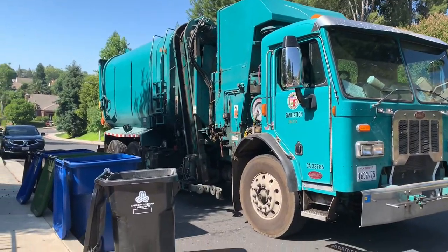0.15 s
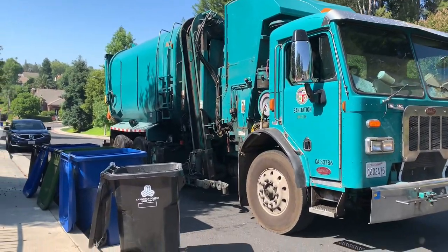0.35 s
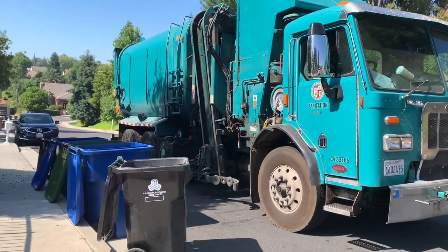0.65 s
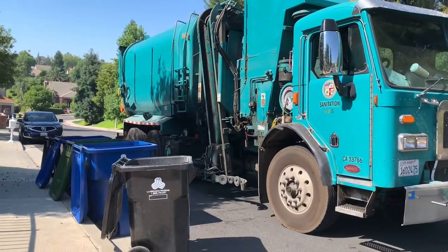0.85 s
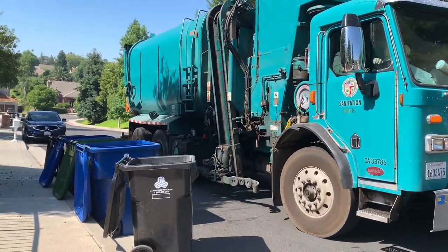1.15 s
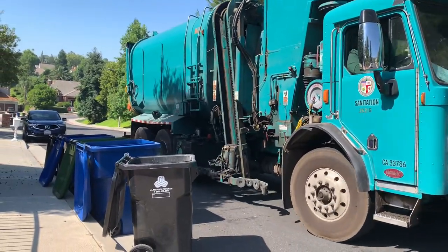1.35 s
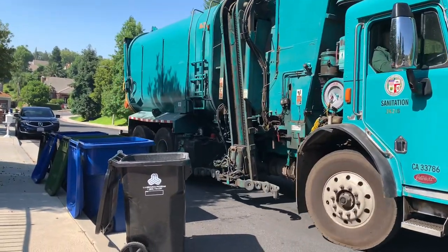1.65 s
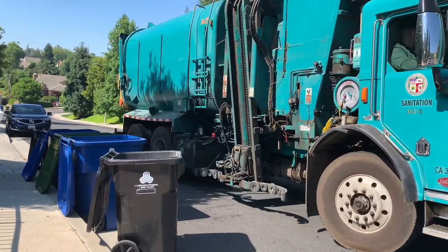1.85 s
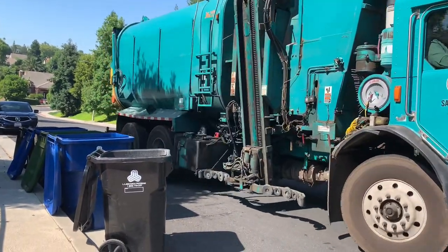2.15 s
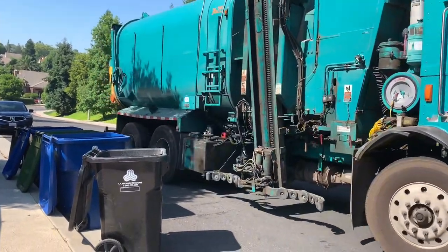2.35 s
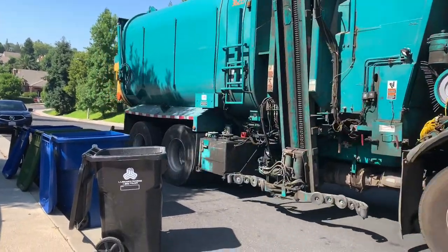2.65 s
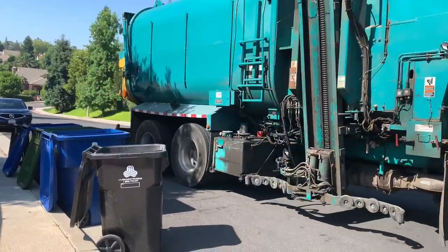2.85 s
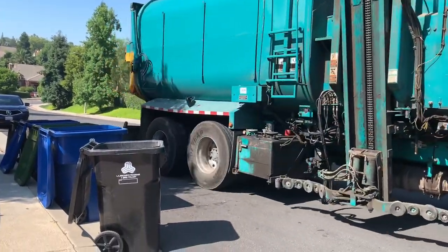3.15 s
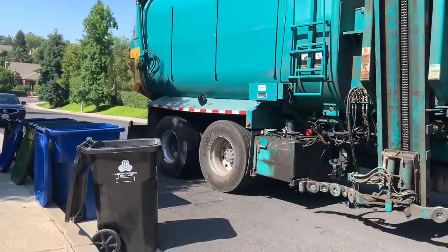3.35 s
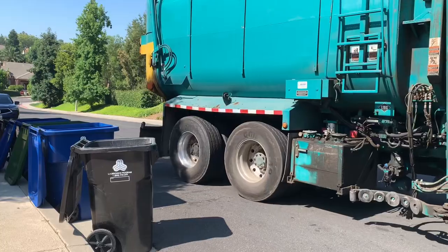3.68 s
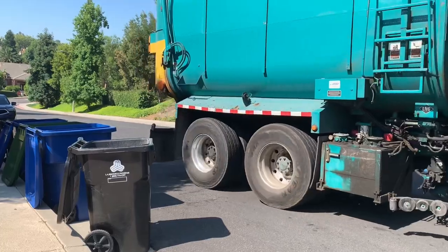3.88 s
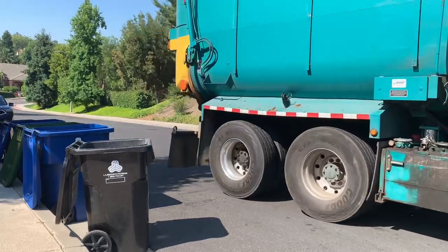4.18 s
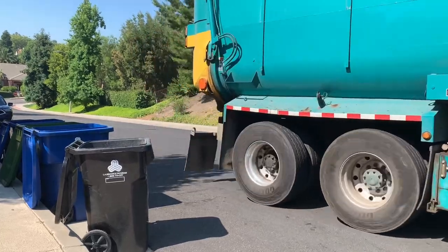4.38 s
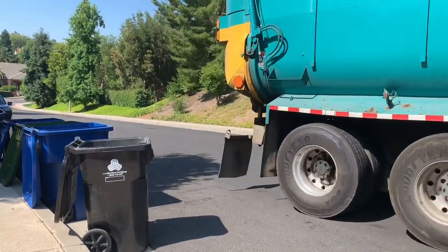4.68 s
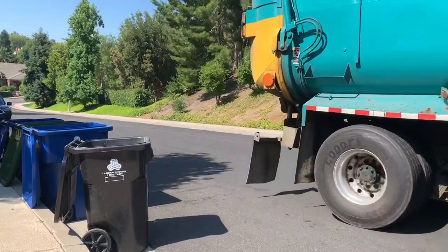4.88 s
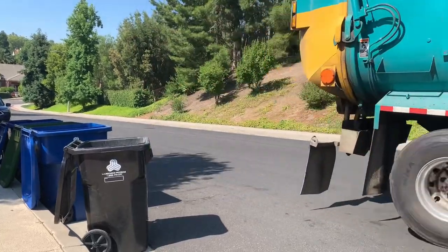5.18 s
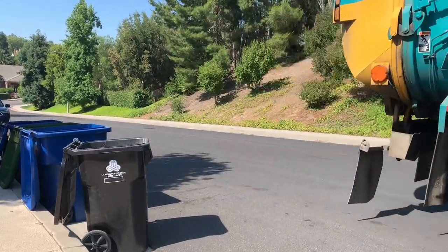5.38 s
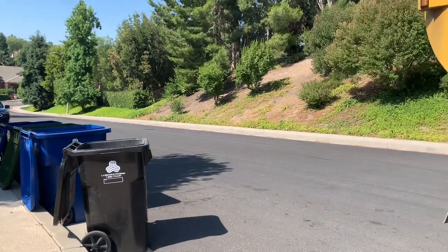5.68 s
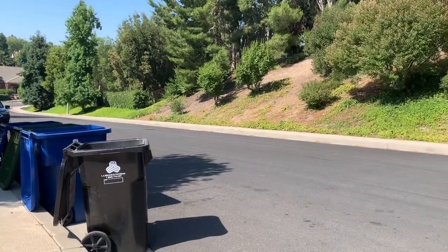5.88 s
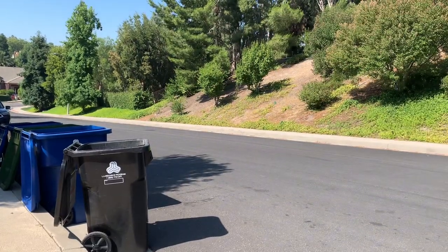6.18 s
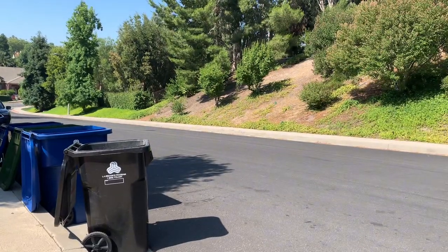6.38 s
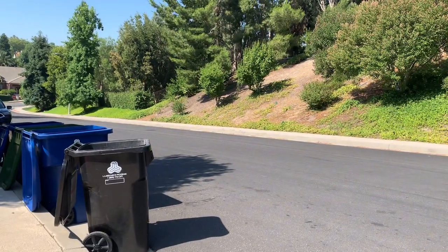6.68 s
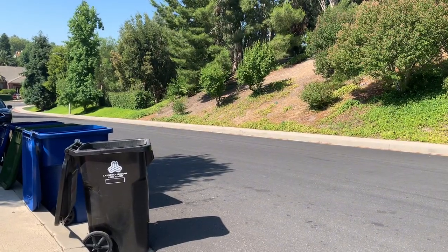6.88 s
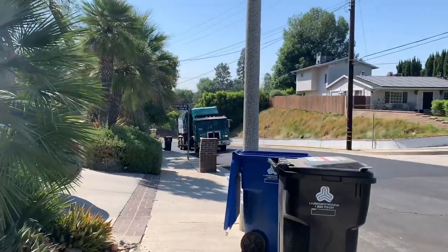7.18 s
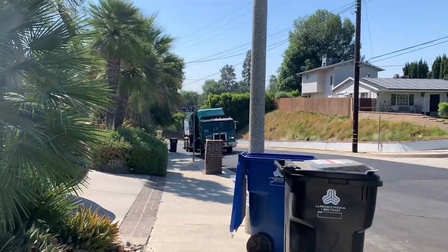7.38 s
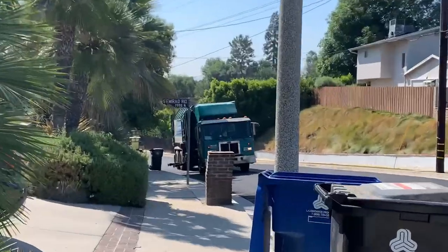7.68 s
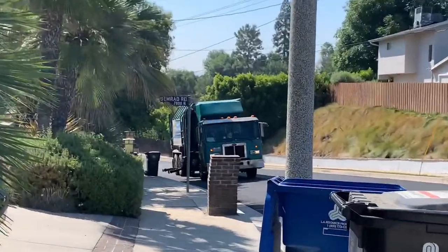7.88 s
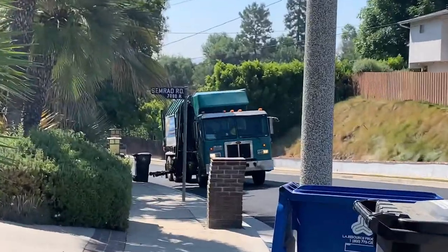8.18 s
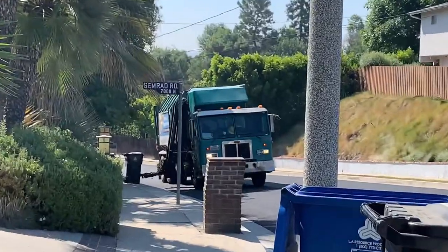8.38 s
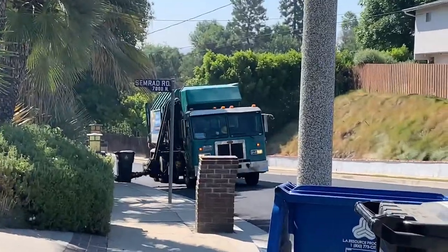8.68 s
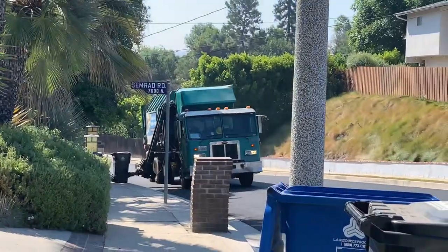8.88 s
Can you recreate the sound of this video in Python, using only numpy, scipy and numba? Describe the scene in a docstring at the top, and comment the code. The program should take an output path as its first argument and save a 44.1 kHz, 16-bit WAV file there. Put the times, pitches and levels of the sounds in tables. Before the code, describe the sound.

A garbage truck's diesel engine growls and climbs in pitch as it pulls away close by, then idles far off with hiss and dull arm knocks.

```python
"""A truck engine's exhaust growls and climbs in pitch as a six-cylinder refuse truck pulls away past a phone
on the kerb; then, from far down the street, the truck idles and works its arm.
Steady sines locked to the crank give exhaust orders, fan tone and gear whine, which swell at fixed peaks as
they glide past. Filtered noise gives rough exhaust, fan rush, hiss, tyres and vented air; decaying noise
bursts give ticks and arm knocks; gliding tones give whistles, and swelling noise bands a bird's chirps."""
import sys
import numpy as np
from scipy import signal
from scipy.fft import rfft, irfft, next_fast_len
from scipy.io import wavfile
from scipy.ndimage import uniform_filter1d
from numba import njit

SR = 44100
rng = np.random.default_rng(int(sys.argv[2]) if len(sys.argv) > 2 else 0)


def waveform_to_disk(signal):
    """Save audio, clipped to [-1, 1], as 16-bit WAV at the path in sys.argv[1]."""
    frames = np.transpose(np.atleast_2d(signal))
    scaled = np.clip(frames, -1, 1) * 32767
    samples = np.round(scaled).astype(np.int16)
    wavfile.write(sys.argv[1], SR, samples)


def boost(x):
    """Linear amplitude factor 10**(x/20) for a level x in decibels (scalar or array-like)."""
    u = np.asarray(x, float) / 20
    return 10 ** u


N = 398663
T = np.arange(N) / SR
NEAR_END_S = 6.955  # the near scene gives way to the far one
CASE_LAG = 13  # samples by which treble reaches the left port late, round the phone's case
CASE_LAG_MS = 1000 * CASE_LAG / SR


def unit_rms(x):
    """Normalisation: the signal is divided by its root mean square."""
    return x / np.sqrt(np.mean(x ** 2))


def columns(table):
    """Linear interpolation in time: each column of (t, ..) rows becomes a curve."""
    s, *rest = np.transpose(table)
    return [np.interp(T, s, column) for column in rest]


def along(hz, points):
    """Interpolation on a logarithmic frequency axis, from (f, value) points."""
    point_hz, values = np.transpose(points)
    return np.interp(np.log(hz + 1), np.log(point_hz), values)


def walk(rate):
    """Random fluctuation: levels held 1 / rate s and smoothed twice, with a spread near 1."""
    hold = int(SR / rate)
    steps = np.repeat(rng.standard_normal(N // hold + 1), hold)
    return 1.64 * uniform_filter1d(uniform_filter1d(steps, hold), hold)[:N]


@njit
def svf(x, hz, width):
    """Resonance: a state-variable band-pass whose centre may move, with gain 1 at the centre."""
    y, band, low = np.empty(len(x)), 0., 0.
    for i in range(len(x)):
        g, k = np.tan(np.pi * hz[i] / SR), width / hz[i]
        v = (band + g * (x[i] - low)) / (1 + g * (g + k))
        band, low, y[i] = 2 * v - band, low + 2 * g * v, k * v
    return y


def ring(x, modes):
    """Modal superposition: fixed resonances respond in parallel and add."""
    return sum(boost(db) * svf(x, np.full(N, 1. * hz), 1. * width) for hz, width, db in modes)


def skirt(hz, width_hz, db):
    """Narrow-band noise: two equal resonances in series select a band whose centre may move."""
    return boost(db) * unit_rms(svf(svf(rng.standard_normal(N), hz, width_hz), hz, width_hz))


def response_db(hz, peaks, between_db):
    """Frequency response: a gliding tone rises at fixed steep-sided peaks above the floor between_db."""
    grid = np.geomspace(20, 8000, num=4000)
    power = sum(boost(2 * db) / (1 + ((grid - f) / (width / 2)) ** 4) for f, width, db in peaks)
    return np.interp(hz, grid, 10 * np.log10(power + boost(2 * between_db)))


def bursts(times, levels_db, t60s):
    """Impulsive excitation: noise starts suddenly and decays exponentially, by 60 dB in t60."""
    out = np.zeros(N)
    for s, db, t60 in zip(times, levels_db, t60s):
        tail = T[:int(t60 * SR) + 1]
        i = int(s * SR)
        out[i:i + len(tail)] += boost(db - 60 * tail / t60)[:N - i]
    return out * rng.standard_normal(N)


def whistle(table, flicker_db):
    """Frequency modulation: a thin tone glides, silent before its (t, f, level) table and soon after."""
    hz, db = columns(table)
    on = (T > table[0][0]) & (T < min(table[-1][0] + .06, NEAR_END_S))
    return on * np.sqrt(2) * boost(db + flicker_db * walk(17)) * np.sin(2 * np.pi * np.cumsum(hz) / SR)


# likeness of diffuse noise at the two microphone ports: f/Hz, likeness/0-1
PORT_LIKENESS = [(60, 0.69), (250, 1), (500, 0.77), (1000, 0.57), (2500, 0.36), (5000, 0.2), (8000, 0),
                 (14000, 1)]


def coloured(points, case_lag_ms=0.):
    """Coherence: noise of a given spectrum is partly shared by the ports, its shared part late on the left."""
    size = next_fast_len(N)
    hz = np.arange(size // 2 + 1) * SR / size
    same, left, right = (rfft(rng.standard_normal(size)) for _ in range(3))
    like = np.clip(along(hz, PORT_LIKENESS), 0, 1)
    late = np.exp(-2j * np.pi * hz * case_lag_ms / 1000)
    shared = np.sqrt(like) * same * np.array([late, late ** 0])
    pair = shared + np.sqrt(1 - like) * np.array([left, right])
    inside = (hz > points[0][0]) & (hz < points[-1][0])
    return unit_rms(irfft(pair * boost(along(hz, points)) * inside, size)[:, :N])


def rush(colours, db, flicker_db, case_lag_ms=0.):
    """Broadband flow noise: the near spectrum sounds first and the far one after."""
    near, far = (coloured(c, case_lag_ms) for c in colours)
    return np.where(T < NEAR_END_S, near, far) * boost(db + flicker_db * walk(12))


def between(pipe_db, bay_db, share, near_db, far_db):
    """Level interpolation: a part lies between tail pipe and engine bay, share being the pipe's."""
    return share * pipe_db + (1 - share) * bay_db + np.where(T < NEAR_END_S, near_db, far_db)


# engine speed and reference levels, near then far: t/s, firing rate f/Hz, tail-pipe level/dB, bay level/dB
ENGINE_COURSE = [(0.0, 38.1, -30.5, -51.5), (0.3, 43.58, -29, -49.5), (0.6, 47.95, -26, -47),
                 (1.05, 51.73, -23, -43), (1.5, 53.87, -22, -40.5), (2.25, 58.7, -22, -37.5),
                 (2.7, 62.2, -21, -35.5), (3.6, 67.24, -18.5, -32.5), (4.5, 72.74, -19, -36),
                 (5.55, 80.97, -18.5, -37.5), (6.15, 89.64, -17.5, -39), (6.3, 90.9, -18.5, -39),
                 (6.45, 92.4, -19, -39), (6.62, 93.2, -20, -40), (6.78, 92.6, -20.5, -41),
                 (6.86, 91.3, -21, -42), (6.95, 91.7, -21.5, -42.5), (6.96, 33.3, -33.5, -53.5),
                 (7.34, 36.15, -30.5, -56.5), (7.5, 34.48, -31.5, -51), (7.62, 34.75, -32, -52),
                 (7.82, 42.45, -30, -53.5), (7.92, 45.18, -27, -55), (7.99, 43.8, -29, -54.5),
                 (8.12, 38.84, -31.5, -53.5), (8.3, 37.53, -30.5, -59), (8.77, 37.6, -30, -53.5),
                 (9.04, 50.17, -26, -51.5)]


def crank():
    """Phase accumulation: the slightly trembling firing rate is summed into the crank's firing phase."""
    hz, pipe_db, bay_db = columns(ENGINE_COURSE)
    turn = 2 * np.pi * np.cumsum(hz * (1 + .002 * walk(15))) / SR
    return hz, pipe_db, bay_db, turn


# clean lines (firing, uneven pair, second, fan blades, pump, gear mesh, mesh overtone):
# f as multiple of firing rate/1, flicker level/dB
TONES = [(1, .45), (1.5, 1.5), (2, 1.5), (4.29, 1.5), (15.6, 1.8), (32.33, 2), (64.66, 3)]
MULTIPLES = [k for k, _ in TONES]
BLADES, PUMP, MESH, OVERTONE = MULTIPLES[3:]


def tones(turn, slip, levels_db):
    """Order locking: sines follow multiples of the crank phase, and flutter as panels and echoes shift."""
    out = []
    for (k, flicker_db), db in zip(TONES, levels_db):
        phase = k * turn + slip * (k == BLADES)
        out.append(np.sqrt(2) * boost(db + flicker_db * walk(28)) * np.sin(phase))
    return out


# firing, uneven pair, second, fan blades, third order over the pipe reference:
# near level/dB, far level/dB, loss as the revs smooth out/dB, firing rate where the loss is full f/Hz
ORDER_LEVELS = [(7.5, -7, 0, 33), (-0.5, -9, 9, 74), (11.5, 1, 22, 48.7), (-1, -0.5, 0, 120), (2, 2, 2, 62)]
# resonances of pipe and body met by the low orders: f/Hz, width/Hz, level/dB
PIPE_MODES = [(55, 17, -6.5), (66.3, 17.3, 0), (76, 14, -2), (84.4, 5, -5), (92.94, 3.6, -2.5),
              (147, 21, -11), (167, 8.1, -19), (174.3, 8.7, -6), (184, 14, -7.5), (198.8, 13.6, -1.5),
              (226.4, 19.6, 1), (247.6, 3.7, -4.5), (273.3, 19, -3.5), (325, 6, -5.5), (348, 37, -11.5),
              (353.5, 8.3, -5), (390.4, 10.2, 0)]
# resonances that lift the pump tone, near: f/Hz, width/Hz, level over the bay reference/dB
PUMP_MODES = [(800, 90, 2), (990, 50, 0), (1054, 28, 7), (1095, 44, 6), (1340, 62, 3), (1454, 46, 4)]
# where the gliding mesh and overtone swell, near, as echoes fade and reinforce them: f/Hz, width/Hz, level/dB
GEAR_SWELLS = [(1400, 120, 4), (1525, 90, 11), (1625, 40, 8), (1665, 30, 5), (1730, 40, 3), (1768, 20, 4),
               (1840, 50, 9), (1882, 24, 11), (2040, 70, 1), (2085, 40, 4), (2130, 55, 9), (2165, 35, 11),
               (2225, 30, -6), (2292, 20, 1), (2395, 30, 4), (2445, 45, 12), (2512, 30, 10), (2567, 22, 7),
               (2604, 18, 7), (2714, 32, 9), (2790, 34, 8), (2885, 40, 11), (2952, 22, 5), (3009, 16, 2),
               (2780, 330, -3), (4240, 160, 21), (4520, 130, 17)]
# resonances that lift all three whines from afar: f/Hz, width/Hz, level over the bay reference/dB
FAR_MODES = [(600, 200, -6), (1165, 90, 7), (1225, 60, 8), (1320, 80, 6), (1440, 140, 7), (1570, 120, 9),
             (2620, 200, 5), (2850, 200, 2)]
# bearing of the gear case; the far overtone fades as the truck turns: t/s, left lag/ms, overtone level/dB
GEAR_BEARING = [(0, .04, 0), (1.4, .06, 0), (2, .13, 0), (3.65, .15, 0), (3.75, .41, 0), (4.3, .41, 0),
                (4.9, .35, 0), (6.95, .34, 0), (6.96, -.01, 1), (8.3, -.01, 1), (8.8, -.01, -10)]
PIPE_FLOOR_DB, PUMP_FLOOR_DB, GEAR_FLOOR_DB = -21, -12, -14  # gain away from any peak


def tone_levels(hz, pipe_db, bay_db):
    """Source-filter principle: each line's level is its source level plus the gain at its frequency."""
    near = T < NEAR_END_S
    rough_hz = 41.3  # firing rate from which the uneven orders fade
    low = []
    for k, (near_db, far_db, lost_db, smooth_hz) in zip(MULTIPLES[:4] + [3], ORDER_LEVELS):
        source_db = pipe_db + np.where(near, near_db, far_db)
        smoothness = np.clip((hz - rough_hz) / (smooth_hz - rough_hz), 0, 1)
        low.append(source_db + response_db(k * hz, PIPE_MODES, PIPE_FLOOR_DB) - lost_db * smoothness)
    third = low.pop()
    near_lifts = (response_db(PUMP * hz, PUMP_MODES, PUMP_FLOOR_DB),
                  response_db(MESH * hz, GEAR_SWELLS, GEAR_FLOOR_DB),
                  response_db(OVERTONE * hz, GEAR_SWELLS, GEAR_FLOOR_DB) - 24)
    pump, mesh, overtone = [bay_db + np.where(near, lift, response_db(k * hz, FAR_MODES, GEAR_FLOOR_DB))
                            for lift, k in zip(near_lifts, (PUMP, MESH, OVERTONE))]
    # the far mesh and second order quieten while the revs fall
    falling_hz_per_s = uniform_filter1d(np.minimum(np.gradient(hz) * SR, 0) * (T > 7), SR // 20)
    overrun_db = .09 * falling_hz_per_s
    low[2] = low[2] + 2 * overrun_db
    return low + [pump, mesh + overrun_db, overtone + columns(GEAR_BEARING)[1]], third


# spectra of rough exhaust, one list near and one far: f/Hz, density level/dB
RUMBLE = [(15, -51), (25, -38), (38, -37), (59, -9), (75, -6), (91, -8), (118, -13), (230, -4.5),
          (293, -19.5), (367, -7.5), (436, -18), (600, -25.5), (780, -58), (1320, -120)], [(15, -40),
          (25, -20), (52, -4), (75, -0.5), (151, -5), (204, -7.5), (289, -8), (419, -28), (498, -19.5),
          (600, -19), (780, -59), (1320, -120)]


def exhaust(hz, turn, pipe_db, orders, uneven_db, third_db):
    """Pulsating flow: harmonic orders ride on noise that swells with each firing."""
    harder_cylinder = boost(uneven_db - 5) * np.sin(4 * turn / 3)  # one cylinder burns harder
    rumble = rush(RUMBLE, pipe_db, 0.49) * (1 + 0.4 * np.cos(turn))
    # uneven burning smears the third order into a rough band; its steady part sharpens each firing peak
    rough_third = skirt(3 * hz, 30.4, third_db)
    clean_third = -np.sqrt(2) * boost(third_db - 7) * np.sin(3 * turn)
    fifth_db = pipe_db - 12.5 + response_db(5 * hz, PIPE_MODES, PIPE_FLOOR_DB)
    near_fifth = (T < NEAR_END_S) * skirt(5 * hz, 15., fifth_db)
    return sum(orders) + harder_cylinder + rumble + rough_third + clean_third + near_fifth


# steady side lines of the gear mesh: offset from the mesh as multiples of firing rate/1
MESH_SIDES = [-3.9, -1.95, 1.95, 3.9]
# momentary flares of a side line: middle t/s, length/s, offset in multiples/1, level/dB
FLARES = [(1.71, .14, -1.95, -38), (3.15, .16, -1.95, -34), (3.37, .16, 1.95, -37), (3.57, .14, 1.95, -39),
          (3.9, .15, 1.95, -35), (4.22, .1, .95, -38), (4.58, .1, 1.95, -38), (4.9, .22, -3.9, -35),
          (5.03, .18, -1.95, -33), (5.05, .7, 3.9, -40), (5.52, .3, -3.9, -41), (5.72, .2, -1.95, -41),
          (6.15, .2, -7.8, -42), (6.28, .16, -1.95, -42), (6.4, .12, -2.9, -43), (6.76, .2, .95, -44),
          (8.06, .16, 2.9, -52)]


def mesh_sides(turn, bay_db, mesh_db):
    """Modulation sidebands: shaft run-out gives the mesh faint side lines; now and then one flares."""
    out = 0
    steady_db = np.where(T < NEAR_END_S, bay_db - 15, mesh_db - 17)
    for offset in MESH_SIDES:
        out = out + boost(steady_db + 3 * walk(20)) * np.sin((MESH + offset) * turn)
    for s, length, offset, db in FLARES:
        swell = np.cos(np.pi * np.clip((T - s) / length, -.5, .5))
        out = out + swell * boost(db + 1.8 * walk(20)) * np.sin((MESH + offset) * turn)
    return np.sqrt(2) * out


def gear_roughness(hz, mesh_db, overtone_db):
    """Random modulation: tooth errors leave noise round the mesh and make its overtone partly noise."""
    round_mesh = skirt(MESH * hz, 300., mesh_db - 5)
    return round_mesh + skirt(OVERTONE * hz, 350., overtone_db + np.where(T < NEAR_END_S, 2, -4))


# how strongly the mesh overtone reaches the panel: overtone f/Hz, width/Hz, level/dB
PANEL_REACH = [(4450, 620, 0)]


def panel(hz, bay_db):
    """Resonant excitation: a thin cover buzzes as a noise band while the mesh overtone is near it."""
    reach_db = response_db(OVERTONE * hz, PANEL_REACH, -40)
    return skirt(np.full(N, 4370.), 340., bay_db - 5.5 + reach_db + 2.5 * walk(20))


# spectra of gear-case rush, one list near and one far: f/Hz, density level/dB
CASE = [(940, -23), (1600, 5), (1980, 2), (2330, 6), (3210, -3.5), (4310, -9), (5200, -55), (6760, -55),
        (11400, -120)], [(940, -26), (1600, 1.5), (2050, -4), (2230, 2.5), (2280, -2), (2530, 6.5),
        (3350, -7), (3720, -0.5), (5200, -11), (6760, -41), (11400, -120)]


def gear_case(turn, pipe_db, bay_db):
    """Amplitude modulation: the gear case's broad noise swells with each firing."""
    db = between(pipe_db, bay_db, share=0.3, near_db=0, far_db=0.21)
    return rush(CASE, db, 1.0) * (1 + 0.25 * np.cos(turn))


def fan_blades(hz, turn, slip, blades_db):
    """Blade-passing harmonics: the second blade tone is part sine, part noise blurred by chopped air."""
    blurred_db = blades_db + np.interp(T, [2, 3.5], [-6, -16])  # the body then screens it
    clean_db = blades_db + np.interp(T, [5, 6], [-13, -24]) + 3 * walk(10)
    clean = np.sqrt(2) * boost(clean_db) * np.sin(2 * (BLADES * turn + slip))
    return skirt(2 * BLADES * hz, 70., blurred_db) + clean


# spectra of fan rush, one list near and one far: f/Hz, density level/dB
FAN = [(260, 0), (450, -4), (684, -7.5), (1060, -7.5), (1480, -13), (1820, -15.5), (2000, -17.5),
       (2600, -24.5), (4400, -120)], [(260, 0), (450, -3), (607, -0.5), (900, -8), (1160, -6), (1350, -14),
       (2000, -17.5), (2600, -35), (4400, -120)]


def fan_rush(turn, pipe_db, bay_db):
    """Modulated flow noise: fan air swells with each firing; returned split at 800 Hz as low, high."""
    db = between(pipe_db, bay_db, share=0.66, near_db=3.38, far_db=0)
    fan = rush(FAN, db, 0.97) * (1 + 0.25 * np.cos(turn))
    low = signal.sosfiltfilt(signal.butter(2, 800, fs=SR, output="sos"), fan)
    return low, fan - low


# turbocharger whistle: t/s, f/Hz, level/dB
TURBO = [(0.6, 5387, -74), (1.35, 6330, -60), (1.9, 7030, -66), (3.0, 8286, -52), (3.4, 8800, -39),
         (3.6, 8887, -55), (4.1, 9750, -43.5), (4.5, 9890, -57), (5.1, 10600, -56), (5.7, 11890, -62),
         (6.3, 12780, -62), (6.9, 13695, -54)]


def turbo():
    """Gliding pure tone: the turbocharger whistles higher as time goes on."""
    return whistle(TURBO, 4.5)


# ringing of small bright parts: f/Hz, width/Hz, level/dB
TICK_RING = [(9150, 1500, 3.5), (9940, 790, 1), (13200, 1500, -14), (6500, 1700, -10)]


def valves(turn, hiss_db):
    """Periodic impacts: valve gear snaps every second firing, each unlike, less as the cab moves off."""
    cycle = turn / (4 * np.pi)
    size = boost(2.2 * rng.standard_normal(N // 100))[cycle.astype(int)]
    near = np.interp(T, [0, 3, 5, 6.9], [1.6, 1.06, 1.06, 0.11])
    ringing = unit_rms(ring(rng.standard_normal(N), TICK_RING))
    return near * size * np.exp(-(cycle % 1) / 0.31) * boost(hiss_db) * ringing


# spectra of engine-bay hiss, one list near and one far: f/Hz, density level/dB
HISS = [(2650, -7), (4500, -0.5), (4830, -3), (5390, -5.5), (6120, -3), (7410, -8), (8750, -5),
        (10200, -7.5), (11000, -8.5), (11900, -58), (12400, -1), (13400, -23), (14200, -5), (14700, -31),
        (15000, -26)], [(2650, -31), (4500, 0), (5000, -7), (6090, 7.5), (6670, 3), (8840, 0.5),
        (10100, -1), (11300, -6.5), (12000, -24), (12600, -2), (13600, -17), (14400, -8), (15000, -20)]


def hiss(bay_db):
    """Diffraction delay: the part of the treble noise shared by the ports is late on the left."""
    return rush(HISS, bay_db, 0.69, CASE_LAG_MS)


def tyres(hz, bay_db):
    """Rolling noise: tread hiss fades in, near, as the firing rate climbs from 73 to 88 Hz."""
    rolling = (T < NEAR_END_S) * np.clip((hz - 73) / 15, 0, 1)
    return rolling * skirt(np.full(N, 3000.), 1400., bay_db - 2)


# sharp treble ticks: t/s, ring excitation level/dB, bare click excitation level/dB
TICKS = [(1.4598, -37, -34), (1.5319, -32, -32), (1.9986, -23, -32), (2.103, -26, -34), (2.307, -18, -18),
         (2.377, -31, -36), (2.4128, -21, -34), (2.5084, -22, -30), (2.59, -27, -22), (2.7051, -23, -18),
         (2.9384, -25, -18), (3.1139, -30, -20), (3.241, -23, -32), (3.4917, -28, -18), (3.8953, -24, -30),
         (3.9822, -21, -30), (4.0261, -29, -30), (5.1263, -28, -27)]


def ticks():
    """Impact response: short cracks make small bright parts ring, with a bare click on top."""
    s, ring_db, click_db = np.transpose(TICKS)
    ringing = ring(bursts(s, ring_db, np.full(len(s), .025)), TICK_RING)
    clicks = ring(bursts(s, click_db, np.full(len(s), .01)), [(13600, 7600, 3)])
    return ringing + clicks


# a short squeak: t/s, f/Hz, level/dB
SQUEAK = [(2.16, 10600, -75), (2.18, 10690, -38), (2.23, 10500, -39), (2.26, 10000, -43),
          (2.28, 10050, -75)]


def squeak():
    """Gliding pure tone: one brief squeak falls in pitch for most of its length."""
    return whistle(SQUEAK, 2.0)


# blows of the distant arm: t/s, dull excitation level/dB, treble excitation level/dB
KNOCKS = [(7.239, -45, -33.5), (7.367, -27, -48), (7.388, -36, -52), (7.418, -35, -36), (7.493, -27.5, -51),
          (7.509, -42, -53), (8.151, -27, -34), (8.598, -27, -36), (8.613, -37, -53)]
# resonances of the arm: f/Hz, width/Hz, level/dB
ARM_MODES = [(456.4, 230, 13), (720, 84, 12.5), (1180, 230, 5), (1900, 600, -24)]


def knocks():
    """Struck resonator: dull blows ring the arm, each with a brighter splash."""
    s, db, treble_db = np.transpose(KNOCKS)
    t60 = np.full(len(s), 0.2)
    arm = ring(bursts(s, db, t60), ARM_MODES)
    dull = ring(arm, [(900, 2000, 0)])  # distance takes the top off
    return dull + ring(bursts(s, treble_db, t60), [(3224, 2670, 2.87)])


# blasts of vented air: start t/s, hold/s, level/dB
VENTS = [(7.163, 0.07, -47), (8.05, 0.13, -39)]


def vents():
    """Jet noise: air rises quickly, holds and dies away; returned as lower body, hiss and top-edge sizzle."""
    rise_s, t60_s = 0.061, 0.77
    air = 0
    for s, hold, db in VENTS:
        dying_s = np.clip(T - s - rise_s - hold, 0, None)
        air = air + boost(db - 60 * dying_s / t60_s) * np.clip((T - s) / rise_s, 0, 1)
    body = air * boost(1) * coloured(CASE[1])
    return body, air * coloured(HISS[1], CASE_LAG_MS), air * skirt(np.full(N, 13400.), 2016., -11)


# thin steel notes as the far scene opens: f/Hz, level/dB, t60/s
PINGS = [(7120, -47, 0.25), (9000, -52, 0.56)]


def pings():
    """Free decay: thin steel notes die away exponentially."""
    t = np.clip(T - NEAR_END_S, 0, None)
    return sum(np.sqrt(2) * boost(db - 60 * t / t60) * np.sin(2 * np.pi * hz * t) for hz, db, t60 in PINGS)


# faint far chirps, likely a small bird: t/s, level/dB
CHIRPS = [(7.65, -48), (7.715, -48), (7.762, -50), (7.82, -49)]


def chirps():
    """Swept narrow-band noise: short breathy whistles drop 400 Hz in pitch under a smooth swell."""
    swell, hz, t = np.zeros(N), np.full(N, 4500.), T[:int(.028 * SR)]
    for s, db in CHIRPS:
        span = slice(int(s * SR), int(s * SR) + len(t))
        swell[span] = boost(db) * np.sin(np.pi * t / t[-1])
        hz[span] -= 400 * t / t[-1]
    return swell * skirt(hz, 500., 0)


def placed(x, lag_ms, pan_db):
    """Interaural cues: the left port hears a source by lag_ms late and by pan_db louder."""
    left, right = np.broadcast_to(x, (2, N))
    return np.array([boost(pan_db / 2) * np.interp(T - lag_ms / 1000, T, left), boost(-pan_db / 2) * right])


# where the truck stands: t/s, left lag of tail pipe/ms, of engine bay/ms, left minus right pipe level/dB
BEARING = [(0, 0.026, -0.072, -2), (1.5, 0.12, 0.069, -2), (2.5, 0.33, 0.13, -1.8), (3.5, 0.53, .16, -2),
           (4.5, 0.57, 0.3, -2), (5.5, 0.64, 0.32, -1.5), (6.95, 0.97, 0.38, -1),
           (6.96, 0.38, -0.025, -0.5), (9.04, 0, -0.05, -1)]


def scene():
    """Superposition: all sources add, each placed on the two ports."""
    hz, pipe_db, bay_db, turn = crank()
    # the blade tone runs .04 multiples high until the belt settles
    slip = np.cumsum(np.interp(T, [1.5, 2.5], [.04, 0]) * np.gradient(turn))
    levels_db, third_db = tone_levels(hz, pipe_db, bay_db)
    _, uneven_db, _, blades_db, pump_db, mesh_db, overtone_db = levels_db
    *orders, pump, mesh, overtone = tones(turn, slip, levels_db)  # orders include the first blade tone
    pipe = exhaust(hz, turn, pipe_db, orders, uneven_db, third_db)
    gears = mesh + mesh_sides(turn, bay_db, mesh_db) + overtone + gear_roughness(hz, mesh_db, overtone_db)
    gears = gears + panel(hz, bay_db) + tyres(hz, bay_db)
    fan_low, fan_high = fan_rush(turn, pipe_db, bay_db)
    pump = pump + skirt(PUMP * hz, 110., pump_db - 4)  # oil surge roughens it
    bay = pump + fan_blades(hz, turn, slip, blades_db) + fan_high + knocks() + chirps()
    vent_body, vent_hiss, vent_sizzle = vents()
    case = gear_case(turn, pipe_db, bay_db) + vent_body
    thin = turbo() + valves(turn, bay_db - 2) + ticks() + squeak() + vent_sizzle + pings()
    high = hiss(bay_db) + vent_hiss + np.array([np.roll(thin, CASE_LAG), thin])
    pipe_ms, bay_ms, pan_db = columns(BEARING)
    return (placed(pipe, pipe_ms, pan_db)
            + placed(gears, columns(GEAR_BEARING)[0], 0.2 * pan_db)
            + placed(bay, bay_ms, 0.53 * pan_db)
            + placed(fan_low, 1.43 * bay_ms, 0.6 * pan_db)  # low rush bends further round the phone
            + placed(case, np.minimum(bay_ms, .3), 0.28 * pan_db)
            + placed(high, 0, 0.92 * pan_db))


def low_pass(x):
    """Removes everything above the highest recorded frequency."""
    return signal.sosfilt(signal.butter(12, 15620, fs=SR, output="sos"), x)


def record(dry):
    """High-pass filtering and saturation: the phone cuts the deepest bass and rounds the loudest peaks."""
    ceiling = 1.05  # full scale is 1
    bass_cut = signal.butter(2, 27, "high", fs=SR, output="sos")
    mix = ceiling * np.tanh(signal.sosfilt(bass_cut, dry) / ceiling)
    return low_pass(mix)


dry = scene()
out = record(dry)
waveform_to_disk(out)
```